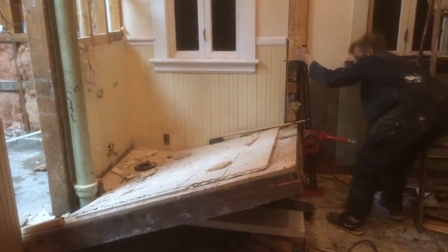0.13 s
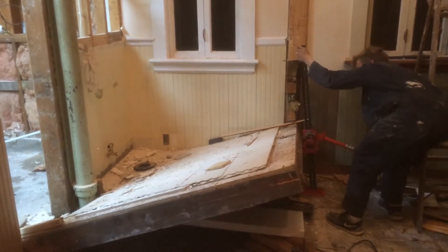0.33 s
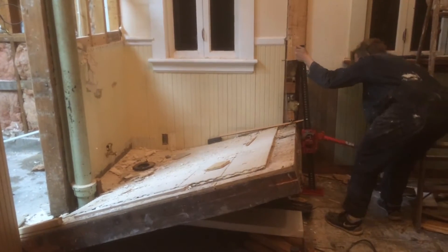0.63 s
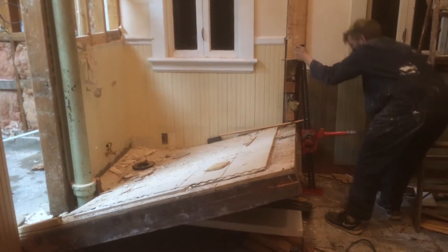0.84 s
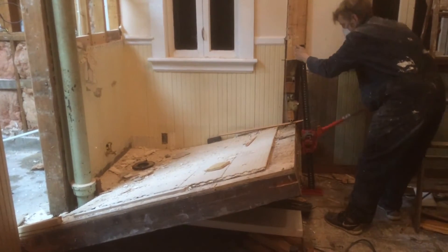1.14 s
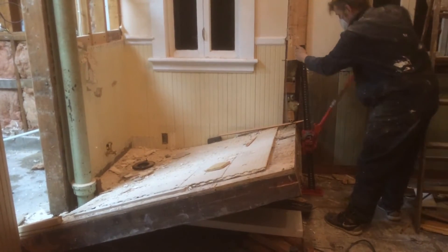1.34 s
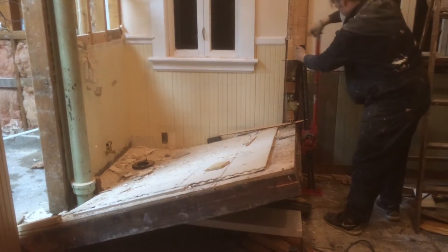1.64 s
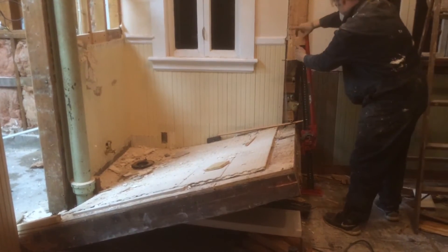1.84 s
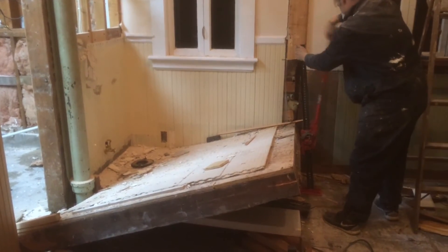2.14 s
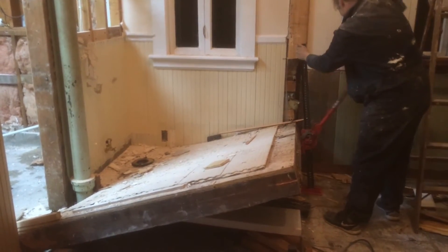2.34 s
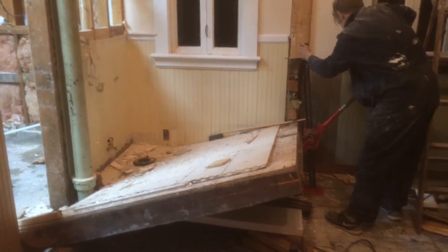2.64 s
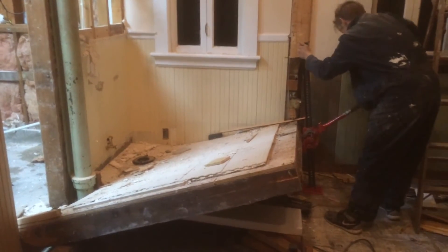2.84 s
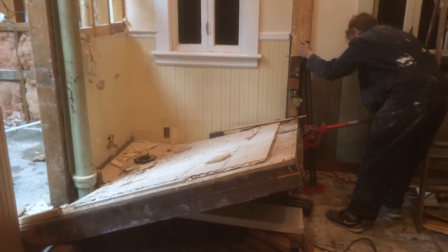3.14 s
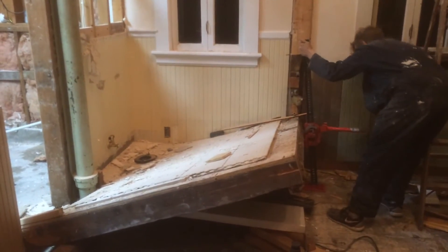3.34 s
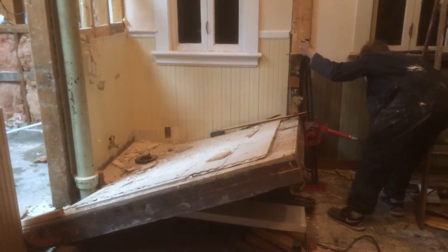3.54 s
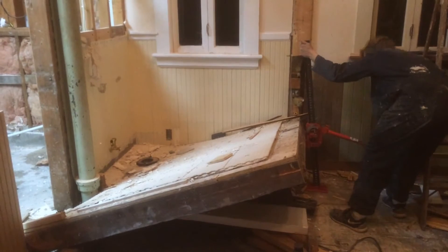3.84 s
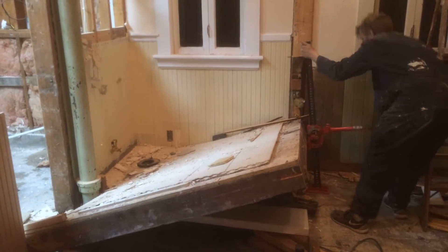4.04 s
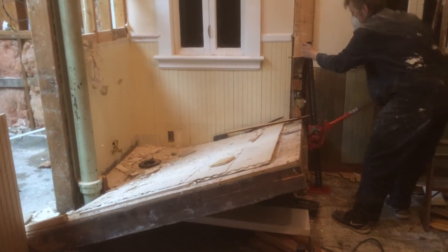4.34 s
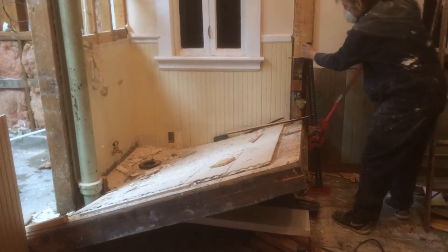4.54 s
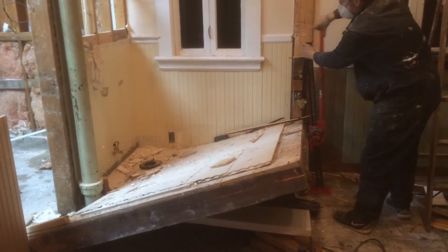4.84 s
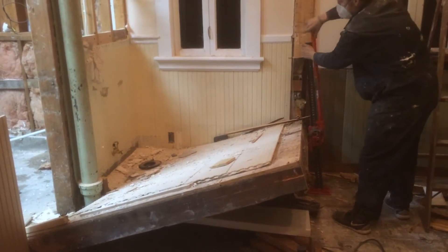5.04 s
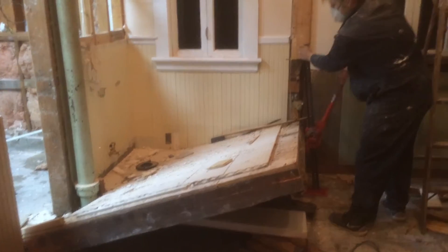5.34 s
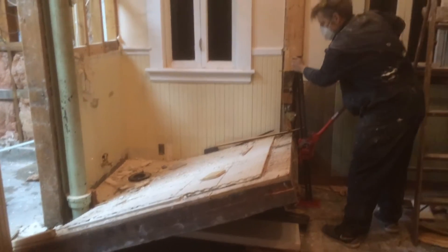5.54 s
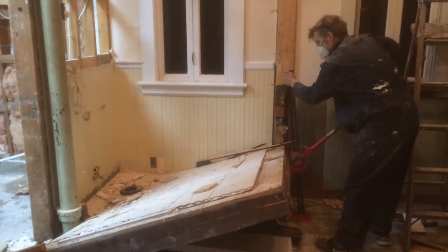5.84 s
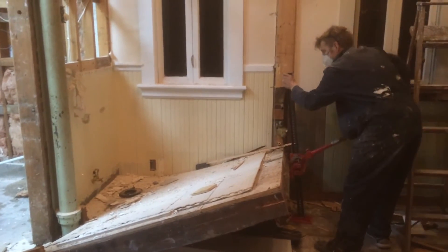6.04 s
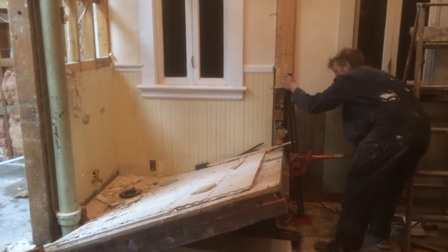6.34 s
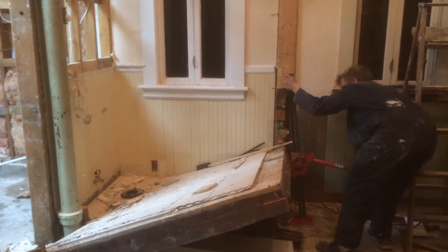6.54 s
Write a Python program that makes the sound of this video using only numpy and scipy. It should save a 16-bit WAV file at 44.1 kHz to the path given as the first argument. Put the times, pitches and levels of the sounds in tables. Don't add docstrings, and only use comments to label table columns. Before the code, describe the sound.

A hand-pumped steel jack heaves a heavy wooden floor section: splintering cracks and groaning wood on each stroke, then metallic clinks and clanks in a bare room.

```python
import sys
import numpy as np
from scipy import signal
from scipy.io import wavfile
from scipy.ndimage import uniform_filter1d

SR = 44100
rng = np.random.default_rng(int(sys.argv[2]) if len(sys.argv) > 2 else 0)


def convert_level_to_amplitude(level_db):
    exponent = np.asarray(level_db, float) / 20
    return 10 ** exponent


def unload_wav(signal):
    wavfile.write(
        sys.argv[1],
        SR,
        np.round(np.clip(np.atleast_2d(signal).T, -1, 1) * 32767).astype(np.int16),
    )


N = 294588

# hz [Hz], level_db [dB]
SNAP = [(880, -9.5), (1500, -4.5), (2600, 4.5), (4200, 1.5), (5300, -1.5), (6600, -1), (11400, -3),
        (14900, -8), (16000, -15)]
# hz [Hz], level_db [dB]
BOARD = [(180, -43.5), (300, -15.5), (341, -5), (366, -6.5), (398, -3.5), (566, -4.5), (1200, -1.5),
         (1320, 0.5), (1490, -4.5), (1650, -1), (2120, -8), (2840, -15), (5000, -24), (6500, -20.5),
         (11000, -120)]
SNAP_S = 0.0015
EDGE_HZ = 15500


def evened(x):
    return x / np.sqrt(np.mean(x ** 2) + 1e-20)


def read(points, hz):
    f, value = np.transpose(points)
    return np.interp(np.log(hz + 1), np.log(f + 1), value)


def add(mix, s, sound):
    part = mix[round(s * SR):][:len(sound)]
    part += sound[:len(part)]


def colour(x, spectrum, size=2048):
    gain = convert_level_to_amplitude(np.maximum(read(spectrum, abs(np.fft.fftfreq(size, 1 / SR))), -80))
    log_response = np.conj(signal.hilbert(np.log(gain)))
    taps = np.fft.ifft(np.exp(log_response)).real[:size // 2]
    return signal.oaconvolve(x, taps / np.linalg.norm(taps))[:len(x)]


def burst(noise, rise_s, fall_s):
    t = np.arange(len(noise)) / SR
    return noise * (1 - np.exp(-t / rise_s)) * np.exp(-t / fall_s)


def push(db, fall_s):
    t = np.arange(1000) / SR
    shape = t * np.exp(-t / fall_s)
    return convert_level_to_amplitude(db) * shape / np.linalg.norm(shape)


def ring_of(hz, width):
    t = np.arange(SR // 2) / SR
    ring = t * np.exp(-1.6 * np.pi * width * t) * np.sin(2 * np.pi * hz * t)
    return ring / np.linalg.norm(ring)


def panel(force):
    # hz [Hz], width_hz [Hz], level_db [dB]
    panel_modes = [(56, 40, -8), (82.6, 9.8, -6.5), (132.6, 18, 1.5), (189.5, 17.2, -2), (240, 35, -1.5),
                   (275.4, 15.4, -6.5), (344.7, 40.7, -2.5), (417.8, 25.8, -8.5)]
    ring = sum(convert_level_to_amplitude(db) * ring_of(hz, width) for hz, width, db in panel_modes)
    return signal.oaconvolve(force, ring / np.linalg.norm(ring))[:len(force)]


def room(x):
    # hz [Hz], t60_s [s]
    decay_times = [(100, 0.17), (260, 0.48), (700, 0.59), (1840, 0.44), (4850, 0.37), (12800, 0.27)]
    out = np.zeros(N)
    turn = 2 * np.pi * 11 * np.arange(N) / SR
    for k in range(3):
        taps = np.zeros(SR)
        at = np.arange(300, SR - 20, 20) + rng.integers(0, 20, (SR - 301) // 20)
        taps[at] = rng.choice([-1., 1.], len(at))
        taps[rng.integers(100, 1300, 8)] += 3.
        hz, t, z = signal.stft(taps, SR, nperseg=256)
        decay = convert_level_to_amplitude(-60 * t / read(decay_times, hz)[:, None])
        tail = signal.istft(z * decay, SR, nperseg=256)[1]
        share = np.sqrt(2 / 3) * np.cos(turn + k * np.pi / 3)
        out += signal.fftconvolve(x * share, tail / np.linalg.norm(tail))[:N]
    return out


def hush():
    # hz [Hz], level_db [dB]
    air_spectrum = [(12, -59), (20, -19.5), (65, 4.5), (590, -8.5), (1570, -29), (1910, -28), (2320, -26),
                    (2990, -21.5), (8410, -25), (14300, -32), (16000, -46.5)]
    return convert_level_to_amplitude(-59.5) * colour(rng.standard_normal(N), air_spectrum, size=8192)


def steps():
    # start_s [s], scuff_db [dB], thump_db [dB], thump_hz [Hz], fall_s [s]
    footfalls = [(0.652, -30, -90, 138, 0.081), (0.808, -19, -54, 162, 0.0062),
                 (0.837, -24, -31.5, 335, 0.023), (0.906, -31.5, -32.5, 129.7, 0.093),
                 (0.93, -20, -21, 240, 0.015), (0.959, -17.5, -18.5, 120, 0.016),
                 (1.019, -35, -36, 122, 0.026), (1.178, -35, -49, 130, 0.086),
                 (1.308, -27.5, -30, 149, 0.011), (2.089, -20.5, -73, 397, 0.016),
                 (2.238, -25.5, -46.5, 307, 0.089), (2.319, -35, -39, 200.6, 0.072),
                 (2.468, -26, -61, 144, 0.037), (2.508, -23, -38.5, 395, 0.022),
                 (2.773, -38, -81, 147, 0.022), (4.379, -19, -43, 346, 0.015),
                 (4.409, -39, -35, 140, 0.021), (4.463, -16.5, -60, 124, 0.017),
                 (5.35, -16.5, -35, 137, 0.03), (5.399, -31.5, -60, 358, 0.1),
                 (5.555, -18.5, -44, 380, 0.026), (5.596, -23.5, -32.5, 382, 0.016),
                 (6.059, -13, -24, 134, 0.0078), (6.335, -3.5, -9.5, 320, 0.0087),
                 (1.56, -50, -38.5, 144, 0.046), (3.46, -50, -33, 76.4, 0.07),
                 (4.18, -54, -37, 84.5, 0.059), (5.75, -58.5, -54, 70, 0.079),
                 (6.09, -50, -22, 72.5, 0.039), (1.3, -55, -36, 343, 0.019), (5.053, -50, -28, 150, 0.02),
                 (2.5, -60, -37, 141, 0.036), (4.762, -60, -35.5, 150, 0.027), (5.16, -60, -36, 123, 0.033),
                 (5.24, -60.5, -45, 119, 0.027), (5.055, -60, -34, 75, .04), (5.375, -60, -38, 159.6, .03)]
    # hz [Hz], level_db [dB]
    scuff_spectrum = [(150, -12.5), (250, -16), (402, 0.5), (646, -3.5), (880, -1.5), (1650, -14.5),
                      (2020, -22.5), (3500, -40), (4550, -56.5), (7700, -120)]
    rise_s = 0.011
    noise = rng.standard_normal((len(footfalls), 8000))
    scuff, thump = np.zeros((2, N))
    t = np.arange(8000) / SR
    for (s, scuff_db, thump_db, hz, fall_s), a in zip(footfalls, noise):
        add(scuff, s, convert_level_to_amplitude(scuff_db - 10.5) * burst(a, rise_s, fall_s))
        add(thump, s, convert_level_to_amplitude(thump_db + 3.5) * burst(np.sin(2 * np.pi * hz * t), rise_s, fall_s))
    return colour(scuff, scuff_spectrum) + thump


def chips():
    knock_times = [.907, 1.556, 1.928, 3.445, 3.812, 4.07, 4.16, 5.048, 6.089, 6.669, 1.935, 2.925, .9072,
                   4.071, 5.066, 5.091, 1.943, 1.927, .912, .808, .652, 1.18, 2.252, 2.95, 2.93, 2.79,
                   2.791, 2.772, 4.2, 5.75, 5.05, 6.011, 5.796, 5.904, .348, 4.755, 1.95, .857, 5.4067, .14,
                   .343, 1.555]
    # level_db [dB], centre_hz [Hz], width_hz [Hz], fall_s [s]
    knock_colours = [(-38, 2000, 3500, 0.017), (-38.5, 760, 460, 0.037), (-25, 880, 460, 0.035),
                     (-28, 790, 220, 0.011), (-32.5, 2800, 850, 0.012), (-22.5, 860, 5300, 0.035),
                     (-46, 7300, 2800, 0.0091), (-18.5, 1180, 630, 0.018), (-9.5, 1260, 350, 0.0034),
                     (-15.5, 1020, 210, .02), (-23.5, 448, 55, 0.013), (-30, 323, 51, 0.062),
                     (-17.5, 2500, 1900, 0.0019), (-16, 930, 320, 0.0055), (-23.5, 1200, 570, 0.0044),
                     (-23.5, 1500, 620, 0.0065), (-19.5, 1160, 320, 0.0043), (-20, 890, 1100, 0.0028),
                     (-39.5, 2300, 830, 0.041), (-44, 1560, 900, 0.054), (-46, 1500, 1000, 0.052),
                     (-53.5, 1270, 1400, 0.064), (-61, 8300, 1100, 0.026), (-21.5, 1440, 450, 0.032),
                     (-23.5, 259, 64, 0.042), (-47.5, 1240, 500, 0.019), (-49.5, 2100, 640, .015),
                     (-57, 1100, 600, 0.0092), (-43, 310, 140, 0.045), (-56, 310, 110, 0.072),
                     (-34.5, 750, 250, 0.047), (-47, 7500, 4000, .012), (-54, 1150, 500, .015),
                     (-56, 1500, 1200, .008), (-20, 280, 60, .015), (-40, 430, 120, .04),
                     (-32, 780, 200, .04), (-36, 300, 120, .008), (-54, 10500, 4000, .008),
                     (-30, 330, 50, .04), (-25, 780, 250, .02), (-42, 290, 80, .04)]
    out = np.zeros(N)
    noise = rng.standard_normal((len(knock_colours), 8000))
    for s, (db, hz, width, fall_s), a in zip(knock_times, knock_colours, noise):
        body = evened(signal.fftconvolve(a, ring_of(hz, width))[:len(a)])
        add(out, s, convert_level_to_amplitude(db) * burst(body, 0.00054, fall_s))
    return out


def steel_ring(modes, phases, shakes, tilt_db, seat_s, seat_db):
    t = np.arange(SR // 2) / SR
    split = [(0, 1), (-7, 1.004), (-8, .995)]
    rung = np.zeros(len(t))
    for (hz, db, t60), turns, shake in zip(modes, phases, shakes):
        decay_db = -60 * t / (0.8 * t60)
        for (split_db, factor), p in zip(split, turns):
            level_db = db + split_db + tilt_db * np.log2(hz) + decay_db
            rung += convert_level_to_amplitude(level_db) * np.sin(2 * np.pi * hz * factor * t + p) * shake
    seating = convert_level_to_amplitude(seat_db * np.clip((t - seat_s) / .003, 0, 1))
    rung = rung * (1 - np.exp(-t / 0.0016)) * seating
    return rung / abs(rung).max()


def steel():
    # start_s [s], peak_db [dB], crack_db [dB], thump_db [dB], tilt_db [dB per octave]
    hits = [
        (1.553, -19.5, -18, -38, -2.5),
        (1.926, -21.5, -20, -19.5, 3),
        (4.742, -19, -17.5, -28.5, -1.5),
        (5.0457, -13.5, -15, -13.5, 2.5),
    ]
    # hz [Hz], level_db [dB], t60_s [s]
    hit_modes = [
        [(695, -20, .3), (4414, -2, 0.26), (6000, 1.5, 0.36), (6062, -0.5, 0.22), (4300, -12, .12),
         (7531, -14, 0.13), (8274, -3.5, 0.23), (5890, 2.5, 0.2), (9150, 1.5, 0.2), (10500, -8, .23),
         (11750, 1, 0.23), (12340, -5.5, .16), (14000, -12, .2), (12890, -8, 0.08)],
        [(425, -4, .25), (893, -1.5, 0.57), (987, -1, .35), (1360, -2, 0.22), (2354, -7.5, 0.27),
         (3240, -14, 0.33), (4170, -10, 0.23), (5470, -16, 0.36), (6700, -17, .2), (8200, -14, 0.25),
         (8550, -9, .09), (11000, -20, .1), (9862, -5, 0.091), (10430, -16, .12)],
        [(1145, -15.5, 0.38), (4339, -12, 0.31), (6072, -4, 0.2), (5900, -1, .3), (6665, -11.5, .16),
         (7450, -11.5, .16), (8300, -8, 0.3), (8457, -6.5, 0.14), (9000, -13, 0.31), (10470, -8, 0.28),
         (11770, -4, .22), (12520, -10, .2), (3870, -18, .15), (13600, -7.5, 0.17)],
        [(373, -0.5, 0.36), (900, 4, 0.25), (934, 4, 0.25), (1368, -4, .2), (2380, -13, 0.32), (3265, -5, 0.34),
         (4172, -12, 0.33), (9065, -8, 0.2), (6600, -15, .25), (8170, -9, 0.27), (8400, -2, .12),
         (9500, -8, 0.19), (9825, -10, 0.2), (10340, -14, .25)],
    ]
    # hz [Hz], level_db [dB]
    pin_spectrum = [(180, -36), (300, -18.5), (737, -8.5), (3130, -16), (5430, -8), (6000, -5.5),
                    (6960, -10.5), (14500, -16.5), (16000, -54)]
    # hz [Hz], level_db [dB]
    handle_spectrum = [(180, -27.5), (300, -6.5), (398, 8), (656, -18), (885, -7), (3190, -7),
                       (7080, -13.5), (14700, -20), (16000, -59)]
    crack_falls = [0.0033, 0.0032]
    seat_times = [.016, 0.011, 0.0159, 0.013]
    seat_levels = [-2, -4.5, -2, -1.5]
    flutter_depth, flutter_hz = 0.94, 60
    out, rings, shove = np.zeros((3, N))
    noise = rng.standard_normal((len(hits), 8000))
    phase = 2 * np.pi * rng.random((len(hits), 30, 3))
    lowpass = signal.butter(2, flutter_hz, fs=SR)
    waver = signal.lfilter(*lowpass, rng.standard_normal((14, SR // 2 * 2)))[:, -(SR // 2):]
    flutter = 1 + flutter_depth * evened(waver)
    for i, (s, peak_db, crack_db, thump_db, tilt_db) in enumerate(hits):
        shakes = np.roll(flutter, round(s * SR), axis=1)
        rung = steel_ring(hit_modes[i], phase[i], shakes, tilt_db, seat_times[i], seat_levels[i])
        add(rings, s, convert_level_to_amplitude(peak_db + 8.5) * rung)
        rattle = burst(noise[i], 0.00074, crack_falls[i % 2]) + convert_level_to_amplitude(-12.5) * burst(noise[i], 0.001, 0.028)
        add(out, s, convert_level_to_amplitude(crack_db) * colour(rattle, [pin_spectrum, handle_spectrum][i % 2]))
        add(shove, s, push(thump_db - 0.5, 0.00017))
    return out + panel(shove), rings


def rub_levels():
    # start_s [s], load_db [dB], judder [-1 smooth glide to 1 rough]
    strokes = [
        [(0.0, 5, 0.2), (.05, 0, 0.11), (.18, 0.5, -0.57), (.3, 0.5, -0.36), (.39, 4, -0.34),
         (.54, -7.5, -0.13), (.67, -28.5, 0.14)],
        [(2.9, -17, -0.32), (2.97, -6, -1.05), (3.07, 1.5, -0.81), (3.29, 3, -0.23), (3.5, 0, -0.41),
         (3.64, 0.5, -0.36), (3.78, -6, -0.059), (4.08, -12, 0.2), (4.32, -26, -0.28)],
        [(6.02, -34, 0.31), (6.1, 1, -0.42), (6.23, 4.5, -0.098), (6.31, 2.5, 0.038), (6.38, 4, -0.81),
         (6.47, -8.5, 1.02), (6.55, 0.5, 0.053), (6.68, -3.5, -0.89)],
    ]
    # start_s [s], level_db [dB], fall [dB per s], grit_db [dB]
    stirs = [(.8, -45.5, 34, 14.5), (.97, -25, 157, -8), (1.2, -48, 125, 1), (1.33, -38, 130, -15),
             (1.6, -36, 124, 7), (1.94, -37, 57, 3), (2.34, -34, 202, -13.5), (2.53, -41, 150, -2),
             (2.8, -59, 102, 19.5), (4.42, -45, 46, 3.5), (4.78, -38.5, 120.5, 5.5), (5.06, -36, 79, 5.5),
             (5.38, -35.5, 89, -2.5), (5.62, -38, 152.5, -14), (5.9, -62.5, 27, 20)]
    full_db = [-32.5, -30, -38, -28]
    judder_db = [6.5, 5, 16, -10]
    stirred_db = [-6, -15, -25.5, -20.5]
    rest_db = [-65.5, -64.5, -79.5, -70.5]
    gritty = [0, 1, 1, 0]
    rise_db_per_s = 250
    t = np.arange(0, N + 128, 128) / SR
    power = convert_level_to_amplitude(2 * np.c_[rest_db]) * np.ones(len(t))
    for s, load_db, rough in map(np.transpose, strokes):
        load_db = np.interp(t, s, load_db, -99, -99)
        rough_db = np.c_[judder_db] * np.interp(t, s, rough)
        power = power + convert_level_to_amplitude(2 * (load_db + np.c_[full_db] + rough_db))
    for s, db, fall, grit_db in stirs:
        shape_db = db - np.where(t < s, rise_db_per_s * (s - t), fall * (t - s))
        layer_db = np.c_[stirred_db] + grit_db * np.c_[gritty]
        power = power + convert_level_to_amplitude(2 * (np.maximum(shape_db, -200) + layer_db))
    return [np.interp(np.arange(N) / SR, t, 10 * np.log10(p)) for p in power]


def rubbing():
    # hz [Hz], width_hz [Hz]
    joist = (195, 12)
    groan_db, scrape_db, grit_db, joist_db = rub_levels()
    sizes = convert_level_to_amplitude(1.27 * np.minimum(rng.exponential(1, (4, N)), 5)) * rng.standard_normal((4, N))
    slips_per_s = np.array([[1500.], [5000.], [8000.], [1500.]])
    slips = sizes * (rng.random((4, N)) < slips_per_s / SR)
    groan = panel(convert_level_to_amplitude(groan_db) * evened(slips[0]))
    hum = signal.hilbert(signal.oaconvolve(slips[3], ring_of(*joist))[:N])
    steady = np.real(hum / abs(hum) ** 0.7)
    wood = groan + convert_level_to_amplitude(joist_db - 6.0) * evened(steady)
    scrape = colour(convert_level_to_amplitude(scrape_db) * evened(slips[1]), BOARD)
    grit = colour(convert_level_to_amplitude(grit_db) * evened(slips[2]), SNAP)
    return wood + scrape + grit


def all_cracks():
    # start_s [s], snap_db [dB], knock_db [dB], thump_db [dB]
    slips = [(0.136, -8.5, -25, -14), (0.156, -12, -16.5, -13), (0.177, -12.5, -15.5, -21),
             (0.2688, -7, -31, -8.5), (0.2933, -12.5, -19, -16), (0.3824, -6, -37, -5),
             (0.4142, -14.5, -18, -32), (1.921, -18, -19, -48), (2.9034, -24, -40, -18),
             (2.9262, -5, -16, -15.5), (3.0439, -6.5, -15, -12.5), (3.1767, -14, -35, -7.5),
             (3.2074, -13.5, -42, -34), (3.2328, -11, -39, -43), (3.252, -11.5, -30, -22),
             (3.2608, -19, -19, -19), (3.277, -18, -24, -18), (3.3105, -16.5, -20, -16)]
    # start_s [s], snap_db [dB], knock_db [dB], thump_db [dB]
    last_slips = [(6.0876, -6.5, -34, -14), (6.1455, -11.5, -10, -11.5), (6.2971, -3.5, -21, -21),
                  (6.3319, -4, -18, -3.5), (6.3683, -8, -17.5, -12), (6.448, -10, -13.5, -7),
                  (6.4945, -10, -18, -11), (6.5436, -11, -14.5, -32), (6.6685, -4.5, -3.5, -33)]
    # start_s [s], snap_db [dB], knock_db [dB], thump_db [dB]
    judders = [(2.9478, -5, -27, -11.5), (2.9687, -3.5, -24, -13), (2.9884, -7.5, -16, -12),
               (3.0098, -7.5, -14.5, -17), (3.0794, -6.5, -19, -16), (3.1013, -13, -12, -10),
               (3.1226, -10, -24, -10.5), (3.146, -15, -17, -17), (3.474, -10, -17, -13.5),
               (3.5082, -15.5, -19.5, -11), (3.5445, -15, -20, -9), (3.5815, -20, -29, -22),
               (3.6167, -20.5, -23.5, -18), (3.6544, -17, -17, -14.5), (6.1733, -3.5, -14.5, -9.5),
               (6.2085, -6.5, -20, -11.5), (6.2438, -13, -16.5, -15), (6.5762, -8, -16, -12.5),
               (6.611, -12, -16.5, -13), (6.6474, -9, -18, -16)]
    # start_s [s], snap_db [dB], knock_db [dB], thump_db [dB], tear_s [s]
    drags = [(0.0185, -11, -29, -40, 0.0044), (0.0400, -13.5, -12.5, -9.5, 0.0026),
             (0.3425, -13, -7.5, -5, 0.0033), (3.812, -21.5, -30, -25, 0.0058),
             (3.827, -16.5, -18, -29, 0.011), (3.9535, -17.5, -17.5, -33, 0.014),
             (4.008, -23.5, -28, -44, 0.0087), (4.0689, -14.5, -14.5, -44, 0.0049),
             (3, -24, -31, -34, 0.0045), (6.473, -15, -28, -27, .004), (6.5033, -10, -33, -40, .005),
             (6.464, -17, -21, -37, .004), (6.336, -13, -30, -40, .004), (0.349, -18, -12, -30, 0.003),
             (0.915, -32, -41, -40, .003), (0.968, -42, -40, -50, .003)]
    # start_s [s], snap_db [dB], thump_db [dB]
    ticks = [(0.616, -34.5, -45), (0.690, -35, -28), (0.757, -38.5, -31), (0.828, -45, -23),
             (0.8865, -30, -47), (0.9073, -28, -20), (1.063, -41, -29), (1.3913, -37, -34),
             (1.8245, -39, -51), (1.839, -33, -61), (2.1037, -48, -31), (2.209, -45.5, -46),
             (2.2532, -39.5, -26), (2.5036, -39, -24.5), (2.584, -46, -54.5), (2.7903, -41, -58),
             (4.3752, -44, -33), (4.471, -34, -36.5), (4.589, -39.5, -34), (4.631, -41, -48),
             (4.876, -28.5, -45), (5.191, -41, -49), (5.313, -47, -50), (5.3507, -40, -30),
             (5.4067, -52, -50), (5.646, -49, -48), (5.741, -47, -65), (5.7772, -50, -60),
             (6.012, -46, -57), (2.318, -47, -55), (2.337, -49, -55), (1.156, -45, -46), (0.809, -52, -50),
             (4.05, -36, -50)]
    clean = [(*row, SNAP_S) for row in slips + last_slips + judders]
    settling = [(s, db, db - 7, thump_db, .002) for s, db, thump_db in ticks]
    return clean + drags + settling


def cracks():
    # hz [Hz], width_hz [Hz], level_db [dB]
    chink_modes = [(1500, 450, 2), (3300, 560, -1), (4000, 1100, -0.5), (5360, 490, 4.5), (6790, 170, -5),
                   (8460, 120, -7.5), (11300, 360, -5.5)]
    rows = all_cracks()
    noise = rng.standard_normal((len(rows), 2, 3000))
    snap, knock, shove, jolt = np.zeros((4, N))
    for (s, snap_db, knock_db, thump_db, tear_s), (a, b) in zip(rows, noise):
        splinter = burst(a, .0008, tear_s)
        sharp = SNAP_S / max(tear_s, SNAP_S)
        add(snap, s, convert_level_to_amplitude(snap_db - 3.5) * splinter / abs(splinter).max())
        add(snap, s + .001, np.array([sharp * convert_level_to_amplitude(snap_db - 7)]))
        add(snap, s, convert_level_to_amplitude(snap_db - 21) * burst(a, .001, .009))
        add(jolt, s + .0005, sharp * convert_level_to_amplitude(snap_db - 2) * np.r_[1, 0.27 * a[:8]])
        add(knock, s, convert_level_to_amplitude(knock_db - 3.5) * burst(b, 0.0022, 0.0085))
        add(shove, s, np.sign(a[0]) * push(thump_db + 0.5, .0001))
    bar = sum(convert_level_to_amplitude(db) * ring_of(hz, width)[:2000] for hz, width, db in chink_modes)
    chink = signal.oaconvolve(jolt, bar)[:N]
    return colour(snap, SNAP) + colour(knock, BOARD), panel(shove), chink


def scene():
    air, feet, boards = hush(), steps(), chips()
    metal, rings = steel()
    rub = rubbing()
    wood, thumps, chink = cracks()
    to_room = convert_level_to_amplitude(-1.0) * (wood + boards) + convert_level_to_amplitude(3.0) * metal + convert_level_to_amplitude(-4.5) * feet
    to_room = to_room + convert_level_to_amplitude(-10.0) * thumps + convert_level_to_amplitude(-8) * (chink + rings)
    return (wood + thumps + chink + boards + metal + rings + feet + room(to_room) + rub + air)[None]


def starved(x):
    # from_s [s], to_s [s]
    gap_s = (.03, .13)
    low_hz, share_percent = 9000, 32
    hz, t, z = signal.stft(x, SR, nperseg=1024, noverlap=768)
    level_db = 10 * np.log10((abs(z[hz > 3000]) ** 2).sum(0) + 1e-14)
    blow = np.r_[np.zeros(4), level_db[4:] - level_db[:-4] > 26]
    after = np.arange(40) * t[1]
    short = np.convolve(blow, (after > gap_s[0]) & (after < gap_s[1]))[:len(t)] > 0
    smooth = uniform_filter1d(uniform_filter1d(abs(z) ** 2, size=9, axis=0), size=7, axis=1)
    band_db = 10 * np.log10(smooth + 1e-16)
    valley_db = band_db - uniform_filter1d(band_db, size=90, axis=0) - (hz[:, None] - low_hz) / 1100
    top = (hz > low_hz) & (hz < EDGE_HZ)
    weak = top[:, None] & short & (valley_db < np.percentile(valley_db[top], share_percent, axis=0))
    return signal.istft(np.where(weak, .03 * z, z), SR, nperseg=1024, noverlap=768)[1][:N]


def band_limit(x):
    return signal.sosfilt(signal.butter(12, 16440, fs=SR, output="sos"), x)


def record(dry):
    rolloff = signal.butter(2, 47.1, "high", fs=SR, output="sos")
    thin = signal.sosfilt(rolloff, starved(dry[0])[None])
    edge = signal.firwin(401, EDGE_HZ, window=("kaiser", 8), fs=SR)
    return band_limit(signal.oaconvolve(thin, edge[None], "same"))


dry = scene()
out = record(dry)
unload_wav(out)
```